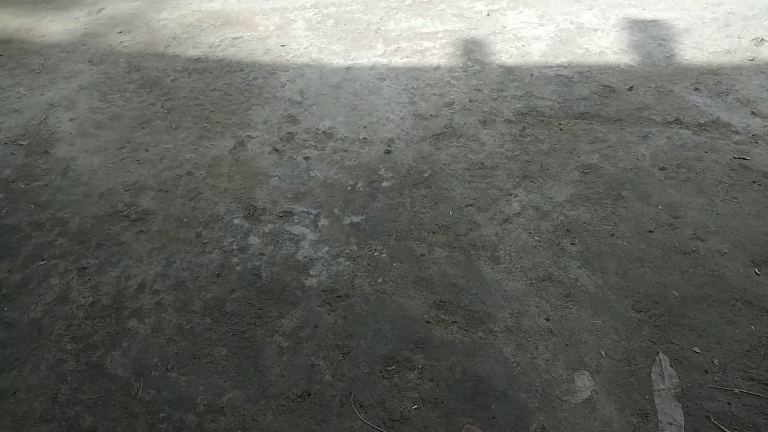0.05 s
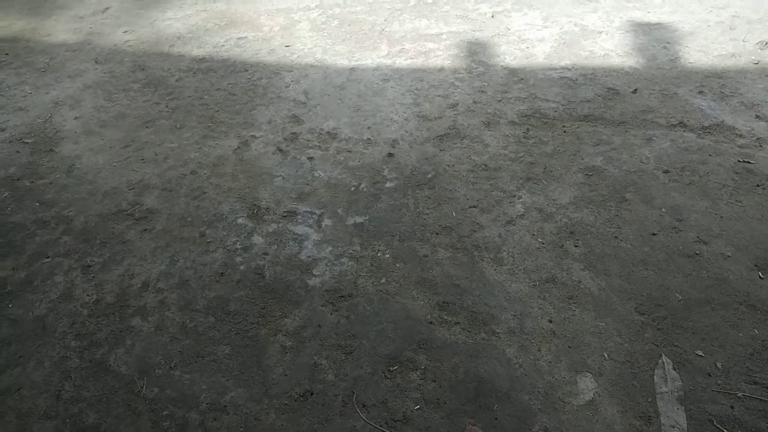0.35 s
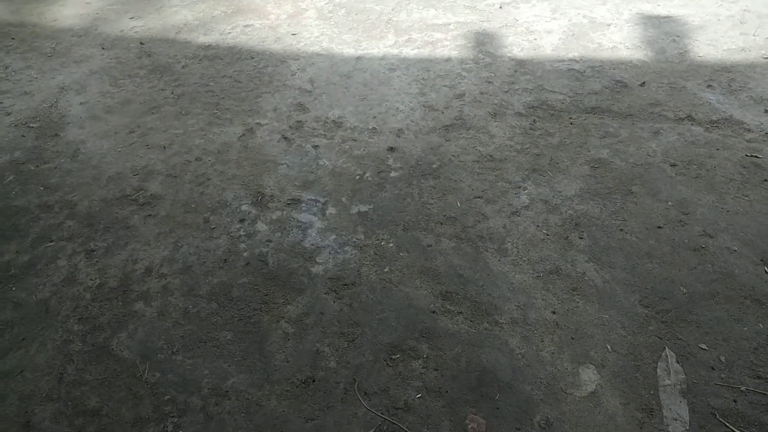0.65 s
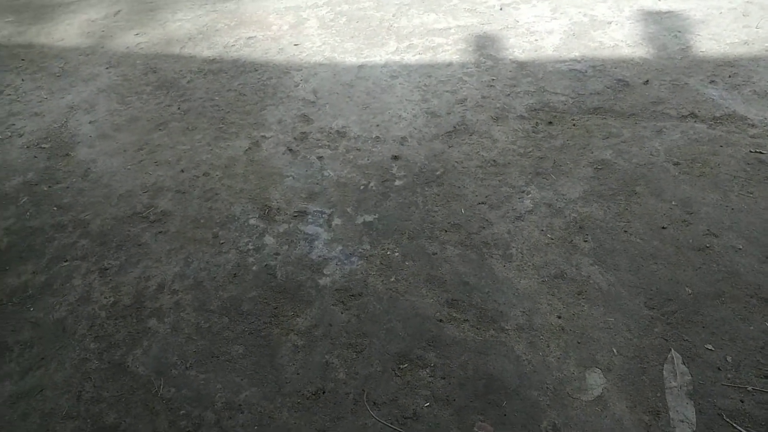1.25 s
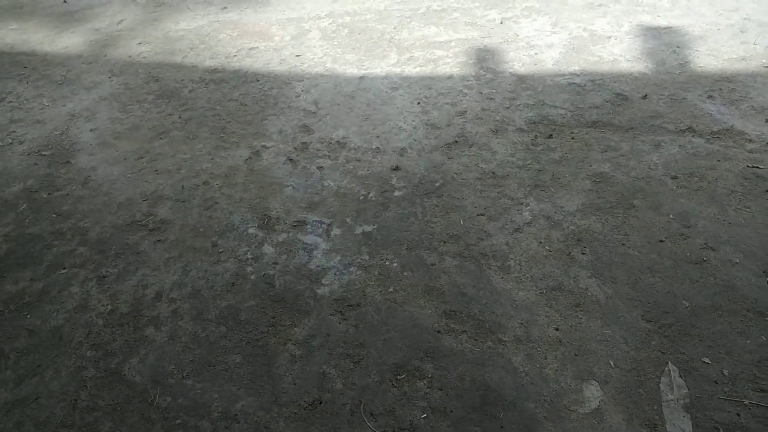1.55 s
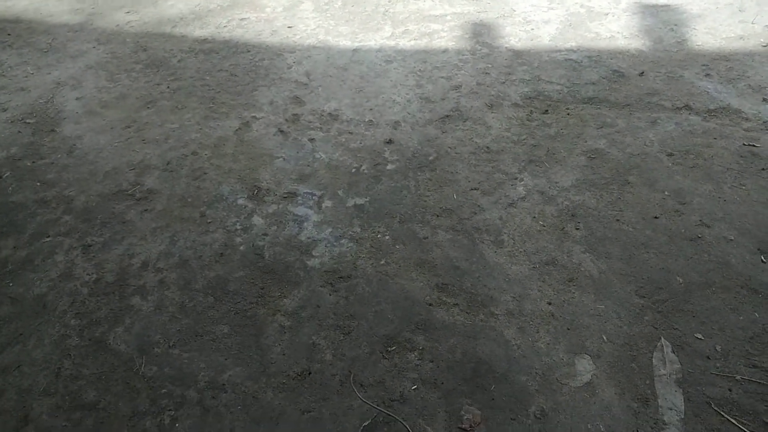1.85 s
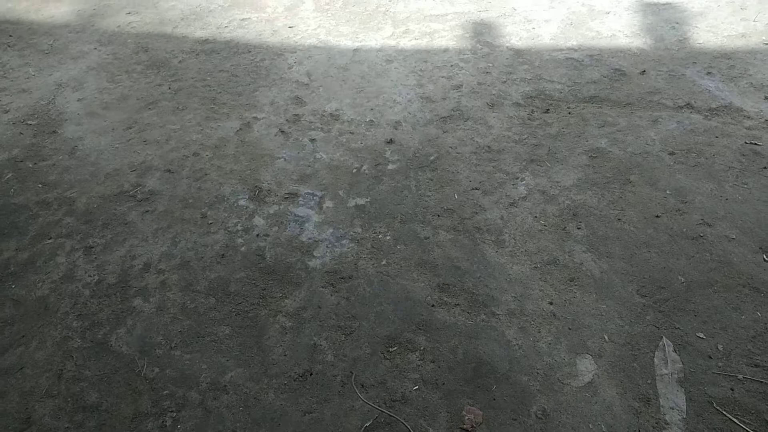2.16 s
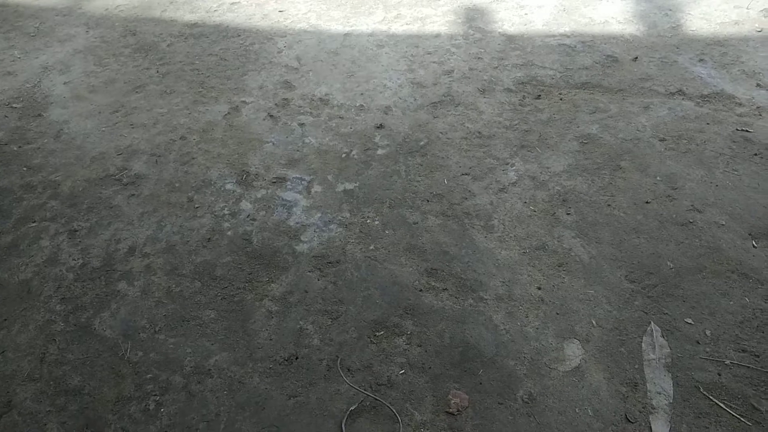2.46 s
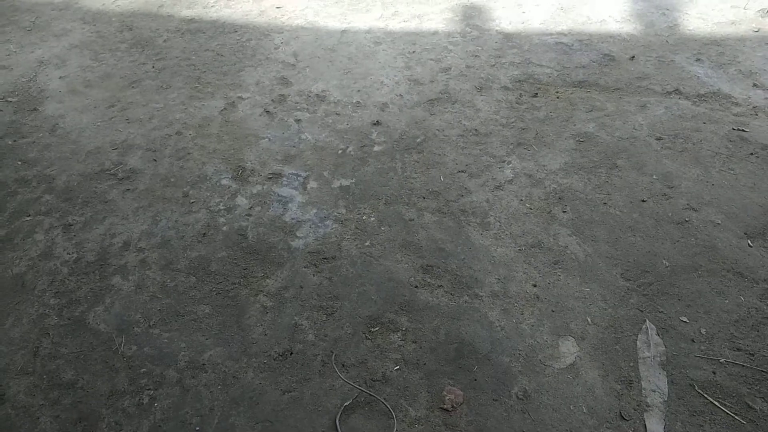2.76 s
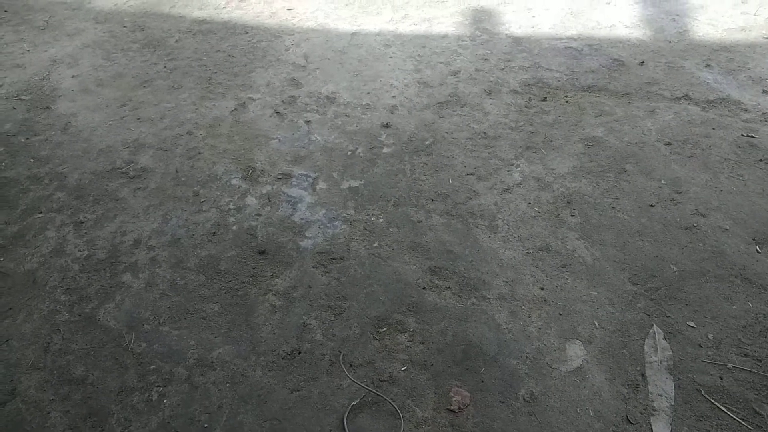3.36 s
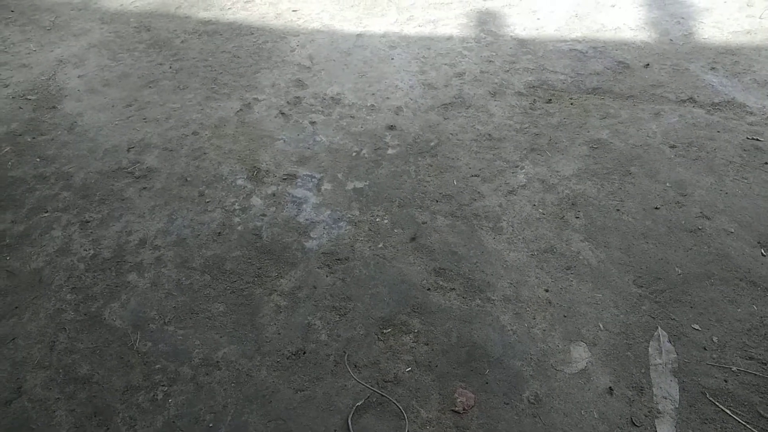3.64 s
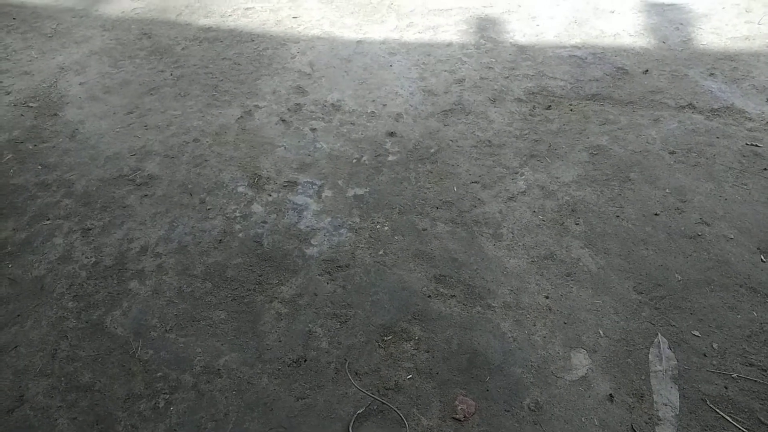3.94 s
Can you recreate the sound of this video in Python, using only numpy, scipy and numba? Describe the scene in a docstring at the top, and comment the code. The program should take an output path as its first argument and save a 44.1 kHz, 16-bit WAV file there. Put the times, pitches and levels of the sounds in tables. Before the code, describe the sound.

A low, steady outdoor rumble with faint shrill insects, light wind buffets and one click.

```python
"""A quiet shaded yard. A far insect chorus shrills over a faint engine drone and distant air, and a bird
peeps three times with a soft echo. Up close are the sounds of a hand-held recorder: light air buffets
the right microphone port, faint scuffs brush by, a sliding finger hisses and rings the gap over the
left port, and the case clicks once."""
import sys
import numpy as np
from scipy import signal
from scipy.fft import rfft, irfft
from scipy.io import wavfile
from scipy.ndimage import uniform_filter1d
from numba import njit

SR = 44100
rng = np.random.default_rng(int(sys.argv[2]) if len(sys.argv) > 2 else 0)


def wav_record(signal):
    """Record a signal, one row per channel, as 16-bit PCM in the file named by sys.argv[1]."""
    frames = np.transpose(np.atleast_2d(signal))
    bounded = np.clip(frames, -1, 1)
    # unit amplitude maps onto the largest positive 16-bit level
    quanta = np.round(bounded * 32767).astype(np.int16)
    wavfile.write(sys.argv[1], SR, quanta)


N = 176400  # 4 s
TIME = np.arange(N) / SR


def undb(db):
    """Decibels to gain."""
    return 10 ** (np.asarray(db) / 20)


def unit(x):
    """Scale to rms 1."""
    return x / np.sqrt(np.mean(x ** 2))


def curve(rows, column=1):
    """Automation lane: straight lines through one column of (time, value, ...) rows."""
    columns = np.array(rows).T
    return np.interp(TIME, columns[0], columns[column])


def per_bin(hz, values):
    """Join points on a log-frequency axis, one value per FFT bin."""
    bin_hz = np.arange(N // 2 + 1) * SR / N
    return np.interp(np.log(bin_hz + 1e-9), np.log(hz), values)


def colour(x, points):
    """EQ a signal through (Hz, dB) points, then scale it to rms 1."""
    gain = undb(per_bin(*np.array(points).T))
    return unit(irfft(rfft(x) * gain, N))


def pan(db):
    """Left and right gains, with the left louder by db."""
    return undb(np.array([[db], [-db]]) / 2)


def walk(rate_hz):
    """Smooth random modulator at rms 1."""
    hold = max(int(SR / rate_hz), 1)
    steps = np.repeat(rng.standard_normal(N // hold + 2), hold)
    return unit(uniform_filter1d(uniform_filter1d(steps, hold), hold)[:N])


def swell(start, length):
    """A rounded fade in and out."""
    return np.sin(np.pi * np.clip((TIME - start) / length, 0, 1))


def flicker(x, depth_db, rate_hz, bands=24):
    """Let each narrow band of a hiss waver on its own."""
    place = np.linspace(0, bands - 1, N // 2 + 1)
    spectrum = rfft(x)
    slices = (irfft(spectrum * np.maximum(1 - np.abs(place - k), 0), N) for k in range(bands))
    return sum(band * undb(depth_db * walk(rate_hz)) for band in slices)


@njit
def bandpass(x, hz, width):
    """State-variable band-pass with a moving centre and width."""
    y, band_state, low_state = np.empty(len(x)), 0., 0.
    for i in range(len(x)):
        g = np.tan(np.pi * min(hz[i], .45 * SR) / SR)
        damping = width[i] / hz[i]
        band = (band_state + g * (x[i] - low_state)) / (1 + g * (g + damping))
        band_state = 2 * band - band_state
        low_state += 2 * g * band
        y[i] = damping * band
    return y


def band_noise(hz, width):
    """Noise through a resonance applied twice, equally strong at any width."""
    centre, width = hz * np.ones(N), width * np.ones(N)
    once = bandpass(rng.standard_normal(N), centre, width)
    return unit(bandpass(once, centre, width) / np.sqrt(width))


# Tone of the distant air (frequency [Hz], relative level [dB])
AIR_EQ = [(20, 4), (80, -6.5), (110, -4.5), (200, -11), (340, -17), (600, -19), (900, -21.5), (2000, -24),
          (3200, -29), (4500, -32.5), (8000, -33.5), (13500, -36.5), (16000, -39.5)]
# Stereo image of the air (frequency [Hz], likeness of the two sides [0-1], left minus right [dB])
AIR_IMAGE = [(41.3, 0.87, 3.5), (253, 0.88, 1.5), (590, 0.57, .5), (1190, 0, 3.5), (2380, 0, 6),
             (4050, 0, 0), (12000, 0, 4)]
def air(level_db=-43.5):
    """A bed of far rumble and hiss, alike at both ports in the bass and diffuse above."""
    hz, likeness, lean_db = np.array(AIR_IMAGE).T
    alike, lean = per_bin(hz, likeness), per_bin(hz, lean_db)
    mid, side = rfft(rng.standard_normal((2, N)))
    sign = np.array([[1], [-1]])
    stereo = np.sqrt(1 + alike) * mid + sign * np.sqrt(1 - alike) * side
    bed = irfft(stereo * undb(sign * lean / 2), N)
    return colour(bed, AIR_EQ) * undb(level_db + .5 * walk(4.35))


# Tones of the far engines (frequency [Hz], average level [dB])
ENGINE_TONES = [(43.3, -48), (65, -51), (82.5, -51.5), (87.7, -47.5), (131, -58.5), (161, -66.5),
                (191, -57.5), (208.5, -62.5), (243, -71), (287, -63), (311, -72), (416, -76)]
def engine_drone(drift=.008, flutter_depth=.35, swell_db=1.0, deep_hz=150, rise_db_per_s=1.63):
    """Low tones drift, swell and flutter one by one; the deepest grow as the engines draw nearer."""
    out = 0
    for hz, db in ENGINE_TONES:
        cycles = np.cumsum(hz * (1 + drift * walk(7))) / SR + rng.random()
        flutter = 1 + flutter_depth * (walk(21.925) + 1j * walk(22.25))  # shakes level and phase
        tone = unit(np.real(flutter * np.exp(2j * np.pi * cycles)))
        rise_db = rise_db_per_s * (TIME - TIME.mean()) * (hz < deep_hz)
        out += tone * undb(db + rise_db + swell_db * walk(3.02))
    return out


# Shrill band of the insect chorus (frequency [Hz], relative level [dB])
INSECT_EQ = [(4000, -41), (4750, -21.5), (5150, -3.5), (5520, -2), (5900, -3), (6350, -7), (6850, -6.5),
             (7150, -16), (7600, -58), (10000, -81)]
def insects(count=5, level_db=-54, pulse_hz=207.3, pulse_depth=.27, swell_db=.8, rise_db_per_s=.25):
    """A slowly gathering chorus, blurred by distance; each insect buzzes at its own pulse rate."""
    chorus = 0
    for _ in range(count):
        rate_hz = pulse_hz * np.exp(.2 * rng.standard_normal() + .03 * walk(5.4))
        buzz = 1 + pulse_depth * np.sin(2 * np.pi * np.cumsum(rate_hz) / SR)
        chorus += buzz * undb(swell_db * walk(3.64)) * rng.standard_normal((2, N))
    rise_db = rise_db_per_s * (TIME - TIME.mean())
    return colour(chorus, INSECT_EQ) * undb(level_db + rise_db) * pan(db=5.5)


# Gusts on the right port (time [s], level [dB])
GUST_LEVELS = [(0, -40), (.25, -44), (.35, -36), (.55, -44.5), (1.17, -43), (1.24, -32), (1.35, -30.5),
               (1.42, -45), (1.56, -33), (1.69, -30.5), (1.82, -42), (1.98, -34.5), (2.07, -41),
               (2.19, -32), (2.35, -47), (2.78, -49), (2.94, -32), (3.25, -44.5), (3.68, -32.5), (4, -52)]
# Tone of the buffeting (frequency [Hz], relative level [dB])
BUFFET_EQ = [(8, -6), (18, 9.5), (55, -1.5), (100, -7.5), (200, -22), (400, -39), (1200, -66)]
# Soft bumps of air (centre time [s], level [dB], half length [s], direction [1 push, -1 suck])
AIR_BUMPS = [(.444, -24.5, .0027, 1), (.6857, -13.8, .0015, 1), (1.233, -22, .0021, 1),
             (1.256, -27, .002, 1), (1.34, -23, .004, -1), (1.551, -23, .0036, 1), (1.678, -24, .0035, -1),
             (1.979, -16.5, .004, -1), (2.004, -22.5, .0011, 1), (2.016, -16.5, .0028, 1),
             (2.203, -24, .0035, 1), (2.43, -27, .0024, 1)]
def wind(skew=.36, left_bleed_db=-30):
    """Eddies rumble on the right port; each bump pushes or sucks, then rebounds more weakly."""
    pressure = colour(rng.standard_normal(N), BUFFET_EQ) * undb(curve(GUST_LEVELS))
    for centre, db, half_length, direction in AIR_BUMPS:
        offset = (TIME - centre) / half_length
        pressure += direction * undb(db) * (skew - offset) * np.exp(-offset ** 2 / 2)
    return pressure * np.array([[undb(left_bleed_db)], [1]])


# Faint scuffs (start [s], length [s], centre [Hz], level [dB], left minus right [dB])
SCUFF_STROKES = [(-.03, .088, 2530, -59.5, 11), (.17, .26, 3100, -59.5, 4), (.315, .02, 1480, -56, -4),
                 (.587, .13, 3200, -62.5, 10), (1.165, .045, 500, -52.5, 3), (1.04, .24, 2300, -59.5, 12),
                 (1.29, .105, 2150, -57, 12), (1.985, .02, 2740, -60, 14), (2.28, .14, 1400, -60, 4)]
def scuffs(width_ratio=.58):
    """Soft brushing near the recorder: bands of noise that fade in and out."""
    return sum(undb(db) * pan(pan_db) * swell(start, length) * band_noise(hz, width_ratio * hz)
               for start, length, hz, db, pan_db in SCUFF_STROKES)


# The bird's peeps (start [s], length [s], starting pitch [Hz], level [dB])
BIRD_NOTES = [(.175, .085, 2790, -57.5), (.27, .1, 3620, -63), (.505, .11, 2790, -59.5)]
def bird(waver=.012, sag_hz_per_s=550, echo_s=.08, echo_db=-5):
    """Short far whistles that waver and sag in pitch, each drawn out by an echo from the yard."""
    peeps = 0
    for start, length, hz, db in BIRD_NOTES:
        pitch = hz * (1 + waver * walk(121.8)) - sag_hz_per_s * (TIME - start)
        peeps += undb(db) * swell(start, length) * np.sin(2 * np.pi * np.cumsum(pitch) / SR)
    return peeps + undb(echo_db) * np.interp(TIME - echo_s, TIME, peeps)


# Fader ride of the finger sliding on the case (time [s], gain [dB])
SLIDE_FADER = [(0, -85), (.34, -65.5), (.47, -56.5), (.58, -58.5), (.645, -54), (.72, -60), (.85, -57),
               (1.015, -60), (1.035, -53.5), (1.18, -50), (1.265, -58), (1.315, -50), (1.378, -50),
               (1.395, -57.5), (1.48, -65), (1.62, -68), (1.72, -60.5), (1.90, -62.5), (1.95, -52.5),
               (2.01, -62), (2.31, -62.5), (2.36, -56.5), (2.41, -62.5), (2.86, -71.5), (3.06, -66.5),
               (3.2, -68), (3.44, -61), (3.49, -69), (4, -66)]
# Tone of the skin's hiss (frequency [Hz], relative level [dB])
SKIN_EQ = [(500, -57), (1200, -0.5), (2100, 5.5), (3000, 1.5), (4200, -1.5), (6500, -3.5), (8500, -1),
           (12000, 0.5), (15500, -3)]
# Resonance between finger and port (time [s], centre [Hz], width [Hz], pre-fader level [dB])
GAP_RESONANCE = [(.4, 10600, 5600, 0), (.65, 10500, 5600, 2.5), (1.015, 11300, 5000, -3),
                 (1.035, 11800, 3300, 4), (1.11, 12500, 3800, 2), (1.2, 13700, 3400, -.5),
                 (1.33, 13000, 5600, .5), (1.95, 13200, 5600, 0), (2.35, 12000, 7000, -2),
                 (4, 11500, 5600, -.5)]
def finger_slide(skin_gain_db=6.5):
    """Skin hisses unevenly on the case and rings the gap over the left port, sharply when it slips."""
    centre_hz, width_hz, gap_db = (curve(GAP_RESONANCE, column) for column in (1, 2, 3))
    gap = undb(gap_db) * band_noise(centre_hz, width_hz)
    skin = undb(skin_gain_db) * colour(rng.standard_normal(N), SKIN_EQ)
    friction = flicker(skin + gap, depth_db=1.1, rate_hz=45)  # uneven grip
    fader = undb(curve(SLIDE_FADER) + .5 * walk(110))
    return friction * fader * np.array([[1], [0]])


# Contacts that fuse into one click (time [s], gain [dB])
CLICK_CONTACTS = [(.4255, 0), (.42666, -19), (.42745, -22.5)]
# Ringing modes of the case (frequency [Hz], level [dB], time to fall 60 dB [s])
CASE_MODES = [(275, -24.5, .021), (410, -24.8, .026), (790, -24.5, .019), (1268, -19.5, .007),
              (1925, -19.8, .011), (3293, -19.2, .0054), (4138, -16, .0035), (5546, -17.1, .0047),
              (6050, -19, .0046), (8222, -23.2, .004), (11980, -19, .002), (14120, -21, .0024)]
def case_click(left_bleed_db=-23, tick_db=-18, tick_hz=14000, tick_lag_s=.00012, tick_decay_s=.00012):
    """The case snaps beside the right port; the left port gets mostly a thin tick, a moment later."""
    ring, tick = 0, 0
    for start, db in CLICK_CONTACTS:
        age = np.maximum(TIME - start, 0)
        for k, (hz, mode_db, t60) in enumerate(CASE_MODES):
            mode = np.sin(2 * np.pi * hz * age) * np.exp(-np.log(1000) * age / t60)
            ring += (-1) ** k * undb(db + mode_db) * mode  # modes alternate in polarity
        tick_age = np.maximum(age - tick_lag_s, 0)
        tick_envelope = undb(db + tick_db) * np.exp(-tick_age / tick_decay_s)
        tick += tick_envelope * np.sin(2 * np.pi * tick_hz * tick_age)
    return np.array([undb(left_bleed_db) * ring + tick, ring])


def scene():
    """The stereo mix: the yard's steady bed, with the bird and the close sounds on top."""
    bed = air() + engine_drone() + insects()
    return bed + wind() + scuffs() + bird() + finger_slide() + case_click()


def record(dry):
    """The recorder cuts the top steeply."""
    cutoff_hz = 15750
    return signal.sosfilt(signal.ellip(10, .2, 80, cutoff_hz, fs=SR, output="sos"), dry)


dry = scene()
out = record(dry)
wav_record(out)
```